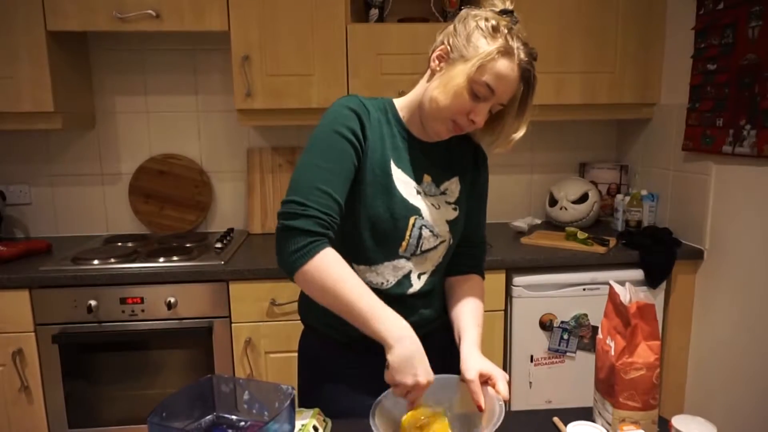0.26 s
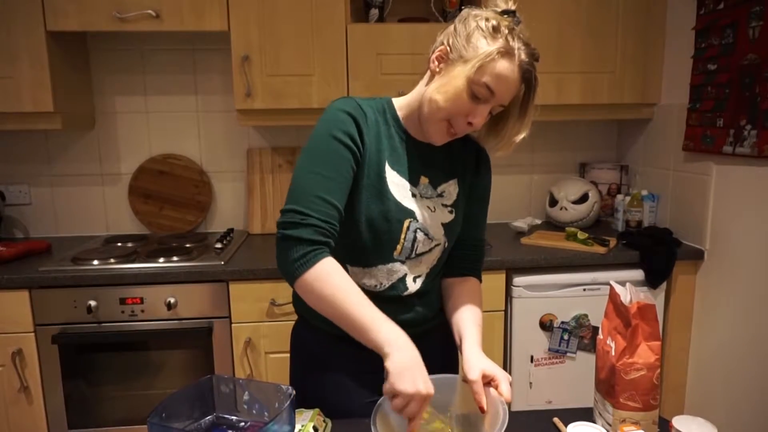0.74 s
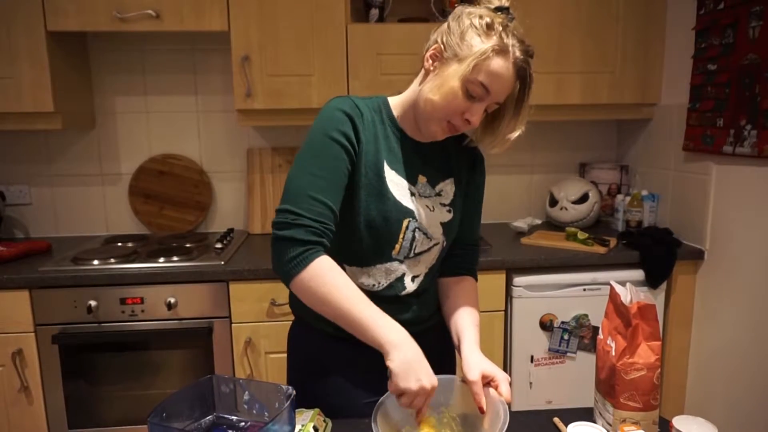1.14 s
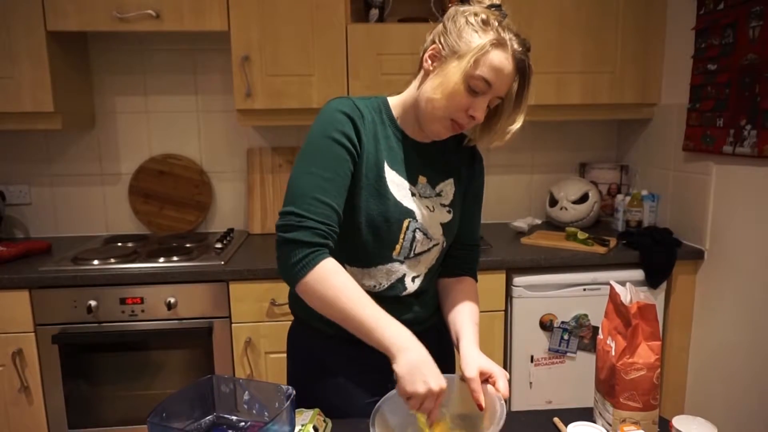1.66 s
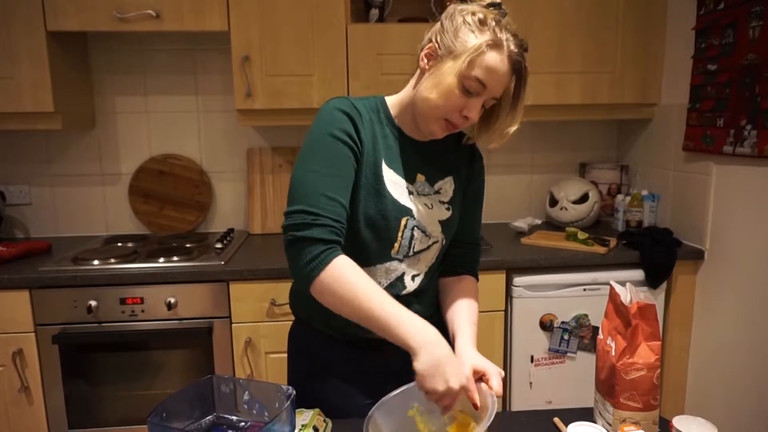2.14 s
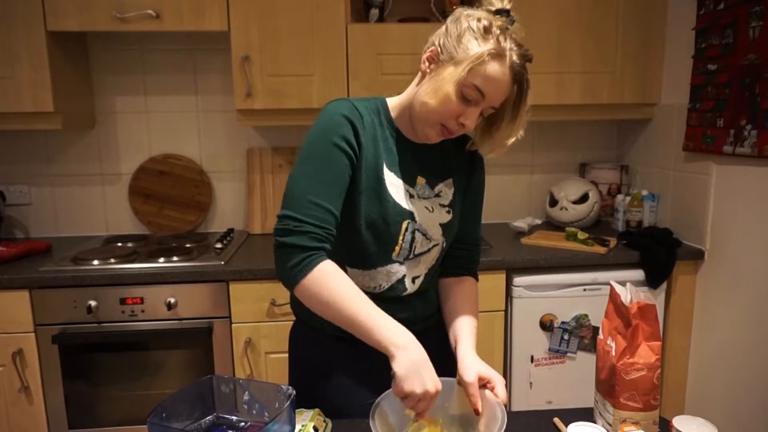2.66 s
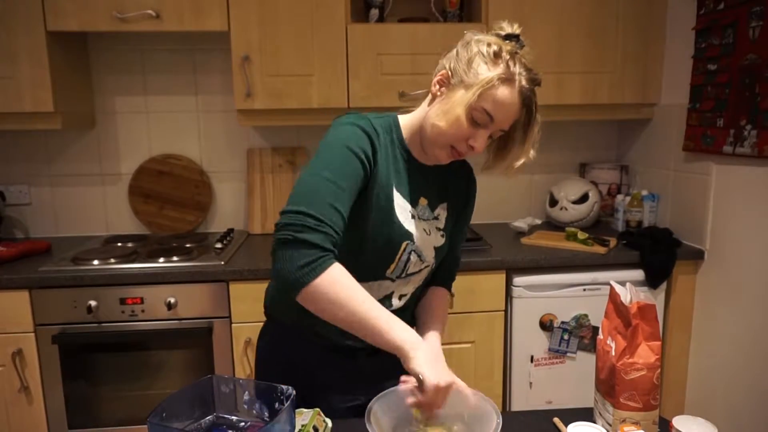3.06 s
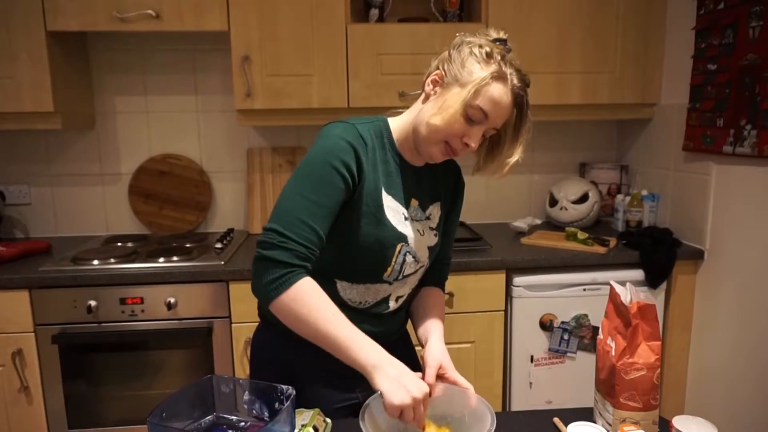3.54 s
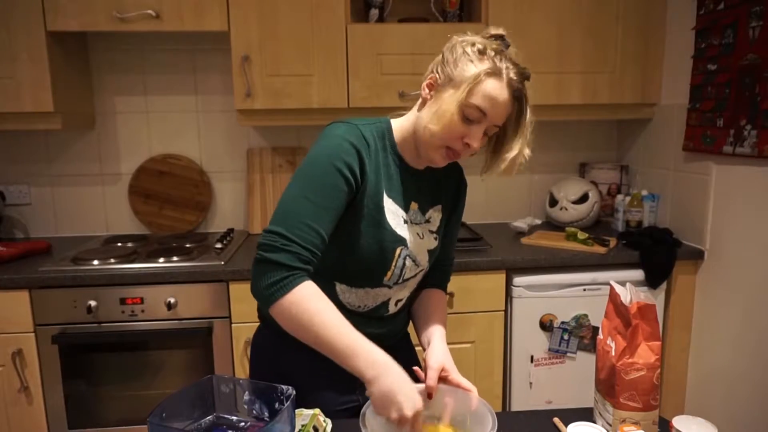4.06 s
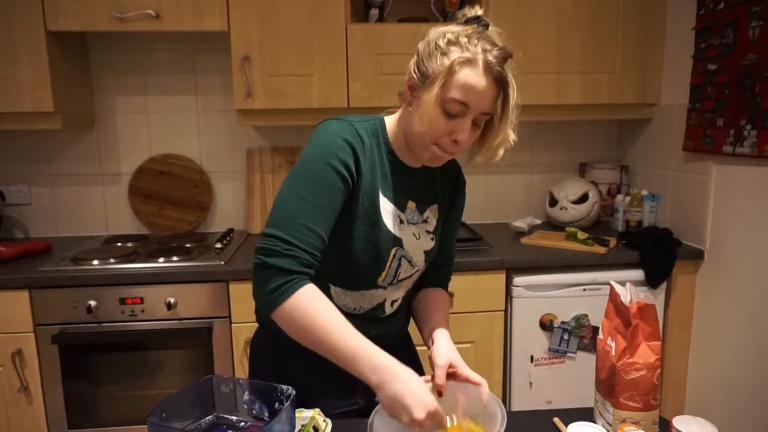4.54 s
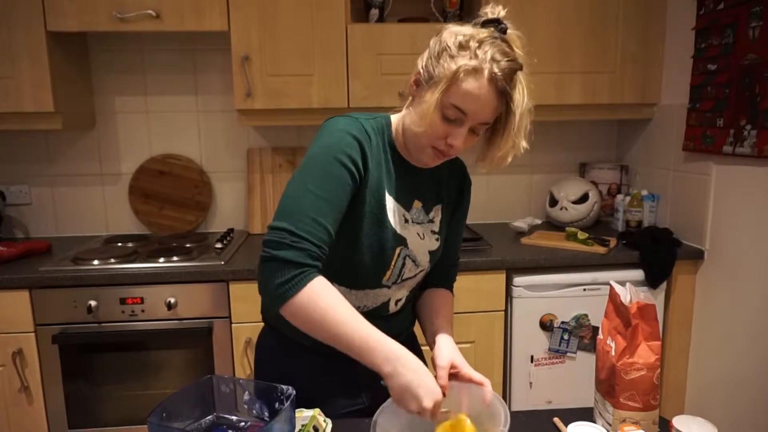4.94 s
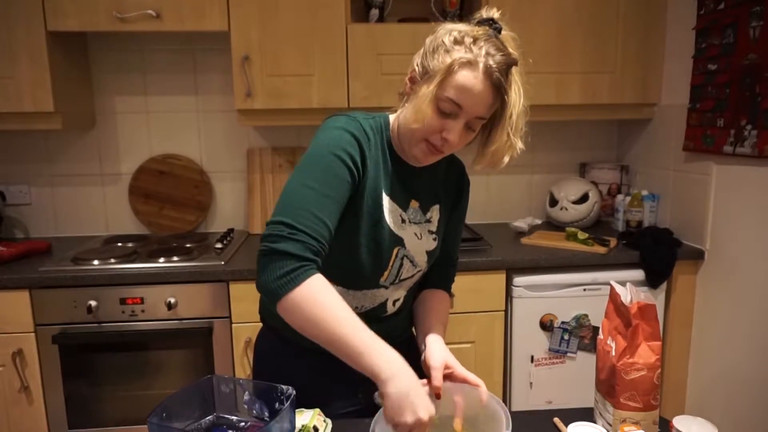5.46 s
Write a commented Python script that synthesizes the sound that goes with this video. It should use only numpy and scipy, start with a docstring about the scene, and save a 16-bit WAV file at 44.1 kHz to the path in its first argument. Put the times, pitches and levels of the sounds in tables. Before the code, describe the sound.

A metal fork whips egg in a plastic bowl on a kitchen worktop, making quick hollow clicks, gritty scrapes and a wet crackle. The strokes start loose and uneven, then grow denser. Midway there are a few tiny bubble pops and a brief squeaky gurgle, and after that the beating is at its hardest. It sounds close, slightly to the right, in a small room with a faint hum.

```python
"""Over a quiet room hum, a fork starts whipping egg in a plastic bowl on a kitchen worktop. Each impact excites
the damped modes of bowl and fork, with a wet crackle; between blows the tines drag over the wall in stick-slip.
At 2.3 s an air bubble pops in the egg, and at 2.64 and 2.82 s the bowl rings out in rising tones near 2.2 kHz.
Just after 3.2 s three pulls gurgle and squeak. The beating is hardest from about 4 to 5 s. Throughout, worktop,
cupboards and tiles reflect the sound as a short reverberant tail."""
import sys
import numpy as np
from scipy import signal
from scipy.fft import rfft, irfft
from scipy.io import wavfile
from scipy.ndimage import uniform_filter1d

SR = 44100
rng = np.random.default_rng(int(sys.argv[2]) if len(sys.argv) > 2 else 0)


def wrap_up_sound(samples):
    """Save the sound to the file named by the first command line argument, as 16-bit audio."""
    columns = np.atleast_2d(samples).T
    # keep every value between -1 and 1, then stretch to whole-number steps
    tamed = np.clip(columns, -1, 1)
    steps = np.round(tamed * 32767).astype(np.int16)
    wavfile.write(sys.argv[1], SR, steps)


N = 251811


def undb(db):
    """Amplitude ratio of a level in dB."""
    return 10 ** (np.asarray(db) / 20)


def unit(x):
    """Normalisation to rms 1."""
    return x / np.sqrt(np.mean(x ** 2, axis=-1, keepdims=True))


def band(x, lo_hz, hi_hz, order=2):
    """Band-pass filtering."""
    edges = [lo_hz, min(hi_hz, .45 * SR)]
    return signal.sosfilt(signal.butter(order, edges, "bandpass", fs=SR, output="sos"), x)


def mode(x, hz, t60):
    """Damped oscillator whose pitch may move; a unit impulse rings with amplitude 1."""
    turn = np.exp(2j * np.pi * np.cumsum(hz + 0 * x) / SR)
    return (turn * signal.lfilter([1], [1, -1000. ** (-1 / (t60 * SR))], x / turn)).imag


# Each row: frequency in Hz, relative spectral density in dB.
HUM_SPECTRUM = [(20, -46), (100, -17), (150, -21), (175, -6), (250, -12.5), (400, -10.5), (1000, -7.5),
                (4000, -58), (16000, -17.5)]
def room_hum(level_db=-60.5):
    """Stationary room and microphone noise, coherent between left and right only in the midrange."""
    hz = np.maximum(np.arange(N // 2 + 1) * SR / N, 1)
    knot_hz, knot_db = np.transpose(HUM_SPECTRUM)
    shape = undb(np.interp(np.log(hz), np.log(knot_hz), knot_db))
    mid, side = rfft(rng.standard_normal((2, N))) * shape
    side *= np.clip(45 / hz + hz / 9000, 0, 1)
    return undb(level_db) * unit(irfft(np.array([mid + side, mid - side]), N))


def grip(patchy_db, hold_ms=12):
    """Intermittent friction: the tines catch and let go, so the level steps at random."""
    hold = int(hold_ms * SR / 1000)
    steps = np.repeat(rng.standard_normal(N // hold + 1), hold)[:N]
    return unit(undb(patchy_db * uniform_filter1d(steps, hold // 2)))


def stick_slip(per_s, scatter_db):
    """Stick-slip friction: a random train of uneven impulses."""
    slips = rng.random(N) < per_s / SR
    return unit(slips * rng.standard_normal(N) * undb(scatter_db * rng.exponential(size=N)))


def tine_contacts(starts, spread_ms=0.68, step_db=-7.5, count=3):
    """Multiple impact: tines land in turn. Gives sample places and sizes, one row a blow."""
    chance = rng.random((len(starts), 2, count))
    lag = np.arange(count) * chance[:, 0] * spread_ms / 1000
    sizes = undb(step_db * np.arange(count)) * (1.1 - chance[:, 1] / 4)
    return np.minimum((starts + lag) * SR, N - 1).astype(int), sizes


def force(places, sizes, drag=0, skid_db=0, grit=0, skid_t60=0.092):
    """Contact force: impulses, plus a decaying skid and a drag that both have the texture of grit."""
    taps = np.zeros(N)
    np.add.at(taps, places, sizes)
    skid = np.sqrt(signal.lfilter([1], [1, -1000. ** (-2 / (skid_t60 * SR))], taps ** 2))
    return taps + (undb(skid_db) * skid + drag) * grit


# Each row: start in seconds, strength in dB, then lower wall, splash and low note offsets in dB.
FORK_BLOWS = [(0.0287,-31,-5.5,-4.5,-3),(0.0802,-51,9,-3,-8),(0.1266,-31.5,-2,-8,1),(0.219,-36,-8,-13,1),
              (0.2424,-51.5,-36,11.5,-5),(0.2728,-36.5,-19,-11,-3),(0.2993,-36,-11,4.5,-3.5),(0.386,-39,-11,-9,-11),
              (0.4068,-40,-15,6.5,-12),(0.4454,-38.5,-5,-0.5,-3),(0.565,-43.5,-17,4,-14),
              (0.6152,-17.5,-25,-10.5,0),(0.6533,-31,-15,1,-4),(0.6806,-33,-34,5.5,4),
              (0.779,-27,-12,-28,0.5),(0.7882,-26,-24,-8.5,-9),(0.8369,-24,-14,-11,-3),
              (0.8926,-23.5,-16,-9,-2),(0.9526,-25,-17.5,-21,-2.5),(1.0059,-17.5,-21.5,-12.5,1.5),
              (1.1678,-21,-12,-23,1.5),(1.2178,-39.5,-33,3,3),(1.284,-25.5,-14,-16,7),(1.3396,-33,-17,-5,8),
              (1.3554,-16.5,-22,-12.5,0),(1.3872,-17.5,-6,-22,0),(1.4414,-22.5,-17,-17,2),(1.4751,-30,-18,-2.5,9.5),
              (1.5006,-23.5,-2,-11,-8),(1.5111,-33,-32,-2,-9),(1.5279,-15.5,-26,-14,12.5),(1.5502,-23,-4.5,-17,0),(1.5709,-29.5,-14,-1.5,-9),(1.5998,-33.5,-6,0.5,5.5),
              (1.6164,-22.5,-6.5,-19,-7),(1.6283,-37,-30,1,-9),(1.6513,-32.5,-47,5.5,-7),(1.6722,-23,-4,-20,-2),(1.689,-34,-22,-2,12),(1.7075,-37,-27,0,4),
              (1.732,-24,-6.5,-18,1.5),(1.7668,-30,-15,-7,2),(1.7914,-25.5,-6,-12,-5),(1.8035,-31.5,-33,-7,-9),
              (1.8249,-25,-14,-3.5,11),(1.8486,-25.5,-9,-16,1),(1.862,-32,-11,-12,-2),(1.879,-28.5,-5,-14,8),(1.92,-32,-1,-3.5,-1),(1.947,-29,-16,-8,7),
              (1.9675,-27,-1,-14,3),(1.9784,-26,-27,-7,-8),(1.992,-25,-10,-6.5,4),(2.023,-26.5,-1,-4.5,2),(2.0354,-29,-24,-1.5,-10),(2.062,-33.5,-3,-20,9),
              (2.0742,-27.5,-17,-4,-8),(2.09,-30,-15,-3,-7),(2.1118,-21,-16,-7.5,9),(2.1385,-18,-6.5,-11.5,3.5),(2.1691,-19.5,-9.5,-10,7),
              (2.2083,-24.5,-10,-33,0),(2.234,-31,-5,-10,3),(2.2723,-40,-56,0.5,1),(2.322,-37.5,-6,-25,2),(2.357,-35.5,-34,-12,-13),(2.4076,-39,-5,3.5,-5),
              (2.4196,-25.5,-17,-22,7),(2.4558,-18.5,-15.5,-13,1.5),(2.511,-19.5,-9.5,-9,5),(2.568,-30,-7,-15,6),
              (2.6231,-34,-5,-13,8),(2.6366,-24,-7,-7.5,3.5),(2.6801,-24,-7,-22,3),(2.7363,-22.5,-4.5,-18,1),
              (2.7948,-40,-16,-20,-2),(2.8167,-23,-23,-34,6),(2.8484,-34.5,-17,0,-6),(2.8863,-26.5,-28,-7,11),
              (2.9137,-30,-0.5,-16,-2),(2.9525,-33.5,-8,-20,10),(2.9752,-25.5,0,-4.5,-10),(3.003,-21.5,-5.5,-9.5,1),
              (3.0485,-38,-2.5,-13,-14),(3.062,-46,-6,-20,10.5),(3.1343,-51.5,11.5,7,-2.5),(3.212,-24,-12,-1,3),
              (3.283,-27.5,0.5,6.5,-0.5),(3.3295,-26,2.5,5.5,-4),(3.3828,-22.5,-7.5,-1.5,1),(3.4316,-20.5,-10.5,-11.5,0.5),
              (3.4607,-38,2,-1,-1),(3.49,-30,-5,-13,-3),(3.5385,-21,-9.5,-8,6),(3.5912,-22,-7.5,-13,6),
              (3.6195,-29.5,2,-4,10.5),(3.647,-29.5,-2,-22,-7),(3.6707,-27,-2,-11,5.5),(3.698,-23.5,-6.5,-12,3),
              (3.7214,-22,1.5,-5,4),(3.7564,-27,-9,-1.5,3),(3.7778,-20.5,2.5,-13,9),(3.8067,-35,-12,3,11),
              (3.8284,-17,5,-8,0),(3.8855,-27,-7,-21,4.5),(3.9374,-23,1.5,-13,-2.5),(3.96,-30,-16,-25,5),(3.968,-29,-20,-23,-3),(3.982,-29.5,-3,0,0.5),(3.993,-27.5,1,-8,-1),
              (4.0426,-20,-12.5,-10.5,3),(4.068,-29,-18,-0.5,-8),(4.0935,-26,-0.5,-15,-0.5),(4.119,-34,-16,-13,3),(4.1506,-15.5,-18,-15.5,5.5),(4.163,-25,-19,-5.5,-5),(4.1983,-9.5,-17.5,-23,2),
              (4.2487,-18,-13.5,-15,-0.5),(4.2999,-23,-4,-5,2.5),(4.3155,-31,-9,-10,2),(4.331,-27,-31,2.5,-3),
              (4.3468,-15,-11,-12.5,-2),(4.3959,-24,0.5,-10,0),(4.4177,-28.5,-13,-15,2),(4.4479,-14.5,-12,-11.5,0),
              (4.4986,-18,-5,-27,-5),(4.5496,-17,-3.5,-21,-5),(4.6029,-16.5,-11,-10,-0.5),(4.621,-29,-21,-7,9),(4.6543,-16,-14.5,-21,-3),
              (4.6745,-23,-25,-16,11),(4.705,-14.5,-15.5,-24,2),(4.7542,-14.5,-18.5,-13,-1),(4.806,-14,-15.5,-17.5,-1),
              (4.8592,-22.5,-10.5,-27,-3),(4.8764,-28.5,-25,-13,3),(4.9079,-19,-10,-12.5,2),(4.927,-26.5,-8,-34,4),
              (4.959,-11.5,-8.5,-14,-7.5),(5.011,-11.5,-11,-16.5,1),(5.0336,-18.5,-23,-16,3),(5.0626,-12,-3,-10,-3),
              (5.0894,-32,-5,-22,3),(5.1185,-22,-9,-29,4),(5.149,-31,-26,-25,-8),(5.168,-27,-11,-19,4.5),(5.201,-24.5,-11,-10,-5),
              (5.229,-15.5,-16,-10.5,-4),(5.2848,-19,-9.5,-15.5,4.5),(5.3365,-21,-5,-7,3),(5.369,-42,-20,-6,-8),(5.391,-36.5,-4.5,-2.5,5.5),
              (5.417,-30,-26,-16,-7),(5.4413,-17,-10.5,-15.5,6.5),(5.499,-37.5,-17,-1,10),(5.5138,-28.5,-14,-22,3),
              (5.5464,-24,-9.5,-16,-6),(5.5977,-26.5,-6.5,-3.5,-17),(5.6355,-32,-46,-7,-6),(5.6564,-24,-16,-12,7.5)]
# Each row: time in seconds, then bowl drag, drag crackle, low note and tine tick, in relative dB.
WHISK_CONTOUR = [(0.0, -49, -44.5, -5, 1.5), (0.51, -55.5, -46, 6.5, -6), (0.78, -50.5, -41.5, 2, -5.5),
                 (1.27, -56, -45, 1, -5), (1.53, -45.5, -47, -4, -6.5), (1.72, -42.5, -38, -1.5, -0.5),
                 (2.05, -40, -38, -2.5, -7.5), (2.26, -54, -44.5, -1, 7), (2.46, -63, -51.5, 1, 1),
                 (2.86, -50, -44.5, -7, -9), (2.99, -44.5, -47, -0.5, -6.5), (3.26, -57.5, -39, 1.5, -0.5),
                 (3.4, -44, -49, 3.5, -4), (3.77, -41, -42.5, -7.5, -0.5), (4.01, -46.5, -42, 4, -4.5),
                 (4.31, -44, -40, 2, -3), (4.91, -42.5, -43, -2, 1), (5.12, -44, -42.5, -1.5, -0.5),
                 (5.34, -68, -53, -4, 7), (5.71, -48, -36, -7, -6)]
def whisking():
    """Forced vibration: impacts and friction of the fork drive bowl, tines, egg and worktop."""
    starts, blow_db, depth_db, splash_db, note_db = np.transpose(FORK_BLOWS)[:, :, None]
    times, drag_db, crackle_db, low_db, tines_db = np.transpose(WHISK_CONTOUR)
    wall_db = blow_db + depth_db
    fizz_db = blow_db + splash_db
    # the low note grows less than in proportion to the blow
    thud_db = 0.6 * wall_db + np.interp(starts, times, low_db) + note_db
    tick_db = blow_db + 0.37 * splash_db + np.interp(starts, times, tines_db)
    t = np.arange(N) / SR
    bowl_drag = undb(np.interp(t, times, drag_db)) * grip(patchy_db=5.5)
    fork_drag = undb(np.interp(t, times, crackle_db)) * grip(patchy_db=4.2)
    low_drag = undb(np.interp(t, times, low_db)) * bowl_drag
    places, sizes = tine_contacts(starts)

    bowl = bowl_modes(places, sizes, thud_db, wall_db, blow_db, low_drag, bowl_drag)
    bowl += fork_modes(places, sizes, tick_db, fizz_db, fork_drag)
    bowl += gurgle()
    bowl += knock(places, sizes * undb((wall_db + blow_db) / 2 + 7), bowl_drag)
    sound = band(bowl, 419, 13600, order=8)  # a small bowl radiates little below its lowest mode
    sound += worktop(places, sizes, thud_db, wall_db, bowl_drag)
    wet = crackle(places, sizes * undb(tick_db + 7.5), undb(-7) * fork_drag, 2320, 7070, shared=0.46)
    wet += crackle(places, sizes * undb(fizz_db + 10), undb(-1.7) * fork_drag, 6500, 10530, shared=0.62)
    wet += crackle(places, sizes * undb(fizz_db), undb(-9) * fork_drag, 10600, 14500, shared=0.16)
    sound += clack(places, sizes * undb(np.maximum(blow_db, wall_db + 6) - 1), fork_drag)
    sound += bare_click(places[:, :1], undb(fizz_db + 0.23 * splash_db + 19.5))
    return sound + wet


def modal_sum(modes, places, sizes, drag, skid_db, spot_db, detune, tilt_db=0, flip=-1):
    """Superposition: each blow hits a new spot and shifts egg and grip, so reweights and retunes modes."""
    norm = np.linalg.norm(undb(np.array(modes)[:, 1]))
    centre_hz = modes[len(modes) // 2][0]
    spot, load = rng.standard_normal((len(places), 2, len(modes))).transpose(1, 0, 2)
    last_blow = np.maximum(np.searchsorted(places[:, 0], np.arange(N), "right") - 1, 0)
    out = 0
    for k, (hz, db, t60) in enumerate(modes):
        weight = flip ** k * undb(spot_db * spot[:, k, None] + tilt_db * np.log2(hz / centre_hz))
        push = force(places, sizes * weight, drag, skid_db, rng.standard_normal(N))
        out += undb(db) / norm * mode(push, hz * (1 + detune * load[last_blow, k]), t60)
    return out


# The bowl's low, middle and high modes. Each row: frequency in Hz, relative level in dB, T60 in seconds.
THUD_MODES = [(423, 0, 0.061), (448, -0.5, 0.045), (501, 1, 0.053), (589, -11.5, 0.069)]
WALL_MODES = [(746, -3, 0.056), (872, 1, 0.036), (1020, 0, 0.03), (1140, 4, 0.016), (1393, 0.5, 0.026),
              (1497, -7, 0.059)]
RING_MODES = [(1937, 0.5, 0.035), (2040, -0.5, 0.021), (2241, 3.5, 0.047), (2353, -3.5, 0.095),
              (2497, -12, 0.052), (2686, -7.5, 0.075), (2889, -7, 0.064)]
def bowl_modes(places, sizes, thud_db, wall_db, blow_db, low_drag, drag):
    """Shell resonance: three families of modes; a harder blow tilts the wall's family upward."""
    thud = modal_sum(THUD_MODES, places, sizes * undb(thud_db - 16), undb(-34.5) * low_drag,
                     skid_db=-33.5, spot_db=2.5, detune=0.0032)
    tilt_db = 0.61 * (wall_db - np.mean(wall_db))  # per octave
    wall = modal_sum(WALL_MODES, places, sizes * undb(wall_db - 0.5), undb(-49) * drag,
                     skid_db=-27.5, spot_db=1.8, detune=0.0055, tilt_db=tilt_db, flip=0.94)
    ring = modal_sum(RING_MODES, places, sizes * undb(blow_db - 10), undb(-32) * drag,
                     skid_db=-26, spot_db=2.5, detune=0.011)
    return thud + wall + ring


# Each row: frequency in Hz, relative level in dB, T60 in seconds.
FORK_MODES = [(3720, -16, 0.07), (4468, -2.5, 0.048), (4750, -4, 0.032), (4920, 3.5, 0.025),
              (5110, 4, 0.018), (5780, -12, 0.01), (7460, -3, 0.017), (8020, 0.5, 0.019), (8840, -5, 0.027)]
def fork_modes(places, sizes, tick_db, fizz_db, drag):
    """Resonance of the steel tines; a wet fork favours its higher modes."""
    wet_db = fizz_db - tick_db
    return modal_sum(FORK_MODES, places, sizes * undb(tick_db - 13), undb(-32.5) * drag,
                     skid_db=-22, spot_db=4.5, detune=0.011, tilt_db=0.9 * (wet_db - np.mean(wet_db)))


def knock(places, sizes, drag):
    """Broadband response of the bowl: a dull knock with a gritty skid."""
    grit = stick_slip(per_s=6000, scatter_db=1.94)
    return band(force(places, sizes, undb(-0.5) * drag, skid_db=-17.5, grit=grit), 840, 3500)


def worktop(places, sizes, thud_db, wall_db, drag):
    """Structure-borne sound: the worktop passes on some bass, and blows low on the wall jolt it."""
    push = force(places, sizes * undb(thud_db - 7), undb(-7) * drag, -17, rng.standard_normal(N))
    jolt = force(places, sizes * undb(wall_db - 3))
    return band(push, 166, 380, order=3) + band(jolt, 47, 140, order=1)


def crackle(places, sizes, drag, lo_hz, hi_hz, shared):
    """Partial coherence: egg crackles all over the bowl, so the ears share only part of its power."""
    both, left, right = (stick_slip(per_s=5000, scatter_db=1.7) for _ in range(3))
    grit = np.sqrt(shared) * both + np.sqrt(1 - shared) * np.array([left, right])
    return band(force(places, sizes, drag, skid_db=-12.5, grit=grit), lo_hz, hi_hz)


def clack(places, sizes, drag):
    """Contact transients: a clack at each impact and sparse sticky clicks from the drag."""
    sticky = undb(-11) * drag * stick_slip(per_s=250, scatter_db=4.5)
    return band(force(places, sizes) + sticky, 700, 5000, order=3)


# Each row: delay in milliseconds, gain in dB.
BOWL_ECHOES = [(1.45, -3), (2.3, -6)]
def bare_click(places, sizes):
    """Early reflection: the spike of steel on bare plastic returns from the inside of the bowl."""
    spike = force(places, sizes)
    echoes = sum(undb(db) * np.roll(spike, int(ms * SR / 1000)) for ms, db in BOWL_ECHOES)
    return band(spike + echoes, 4900, 9000, order=1)


# Each row: peak time in seconds, pitch in Hz, peak in dB, rise and T60 in seconds, climb in Hz a second.
SWELLING_TONES = [(2.325, 880, -44, 0.01, 0.12, 300), (2.6395, 2220, -25, .0025, 0.061, 5900),
                  (2.8192, 2255, -28, .0025, 0.075, 8000)]
def swelling_tones():
    """Rounded tones that swell, climb and die: a bubble pop in the egg, then two rising rings of the bowl near
    2.2 kHz."""
    out = 0
    for at, hz, db, rise, t60, climb in SWELLING_TONES:
        t = np.arange(N) / SR - at
        after = np.clip(t, 0, 1)
        envelope = np.where(t < 0, np.exp(-(t / rise) ** 2), 1000. ** (-after / t60))
        out += undb(db) * envelope * np.sin(2 * np.pi * (hz * t + climb * after ** 2 / 2))
    return out


# Each row: middle in seconds, half length in seconds, drive level in dB.
FORK_PULLS = [(3.218, 0.012, -59), (3.266, .019, -51), (3.303, 0.022, -58.5)]
# Each row: frequency in Hz, gain in dB, T60 in seconds.
GURGLE_MODES = [(715, -2.5, 0.014), (1530, 2, 0.008), (4430, 2.5, 0.005), (7300, -1, 0.0084)]
def gurgle():
    """Friction-driven resonance: the fork, pulled through egg along the wall, gurgles and squeaks."""
    t = np.arange(N) / SR
    pull = sum(undb(db) * np.exp(-((t - mid) / half) ** 4) for mid, half, db in FORK_PULLS)
    return sum(undb(db) * mode(pull * stick_slip(per_s=6000, scatter_db=1.3), hz, t60)
               for hz, db, t60 in GURGLE_MODES)


def kitchen(dry, t60=0.09, tail_db=-12, side_hz=2900):
    """Reverberation: direct sound, then a diffuse tail that differs left and right in the treble."""
    t = np.arange(int(.3 * SR)) / SR
    decay = 1000. ** (-t / t60) * np.minimum(t / 0.005, 1)
    mid, side = rng.standard_normal((2, len(t))) * decay / np.linalg.norm(decay)
    side = signal.lfilter(*signal.butter(1, side_hz, "high", fs=SR), side)
    response = undb(tail_db) * np.array([mid + side, mid - side])
    response[:, 0] += 1
    return signal.fftconvolve(dry, response, axes=1)[:, :N]


def scene():
    """Superposition of the bowl in the room and the hum."""
    return kitchen(whisking() + swelling_tones()) + room_hum()


def record(dry, left_minus_right_db=-2, top_hz=15900):
    """A level difference in the treble places the bowl to the right; a low-pass cuts the top."""
    treble = band(dry, 2620, 17000, order=1)
    gains = undb(np.array([[1], [-1]]) * left_minus_right_db / 2)
    panned = dry + treble * (gains - 1)
    return signal.sosfilt(signal.ellip(8, .2, 70, top_hz, fs=SR, output="sos"), panned)


dry = scene()
out = record(dry)
wrap_up_sound(out)
```